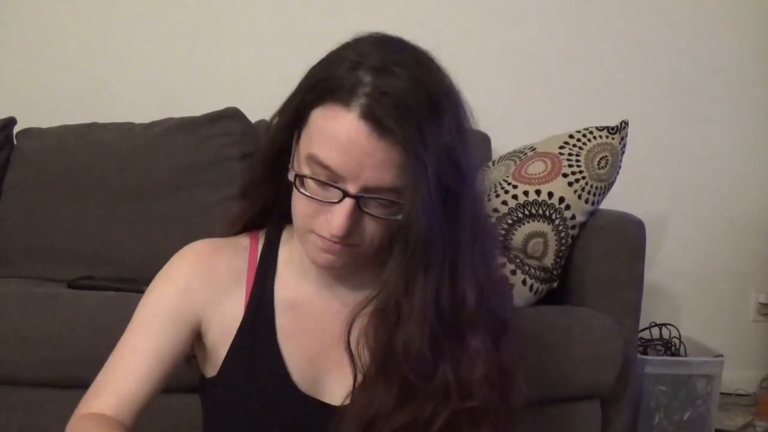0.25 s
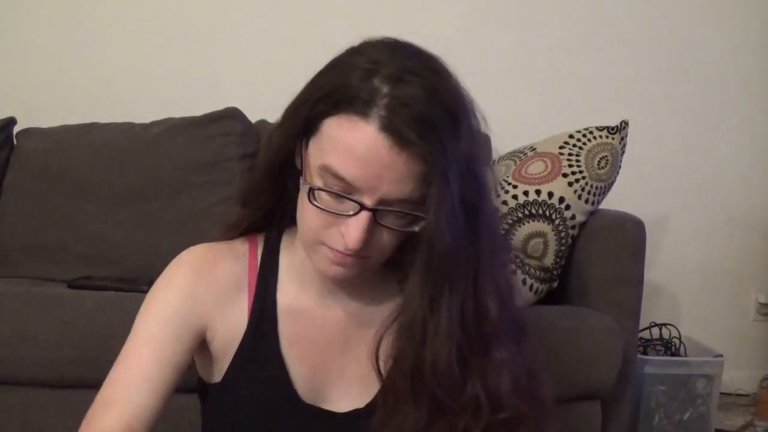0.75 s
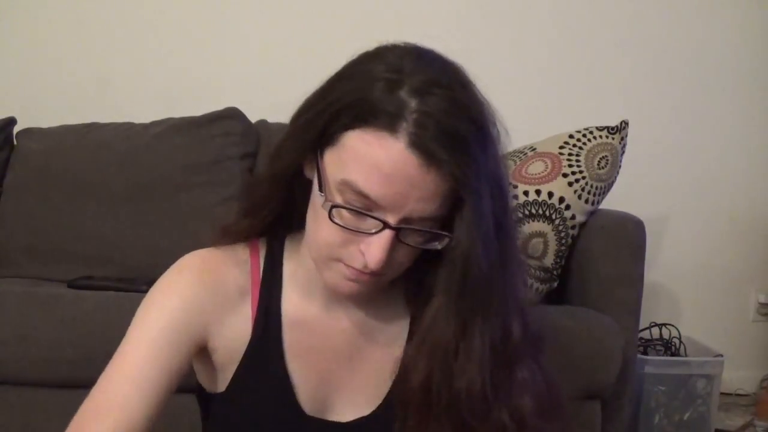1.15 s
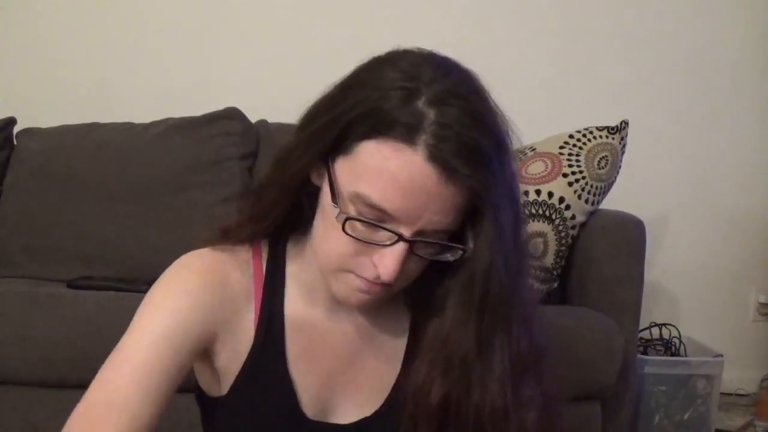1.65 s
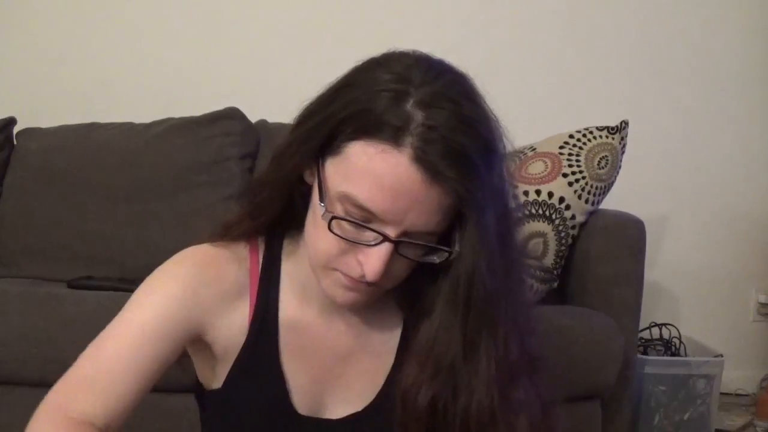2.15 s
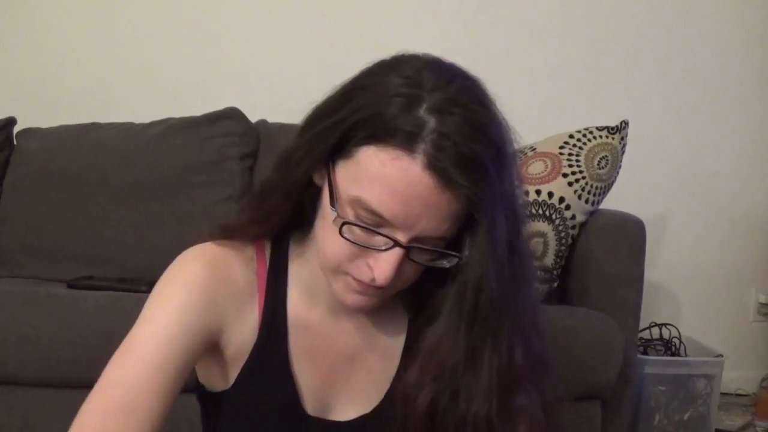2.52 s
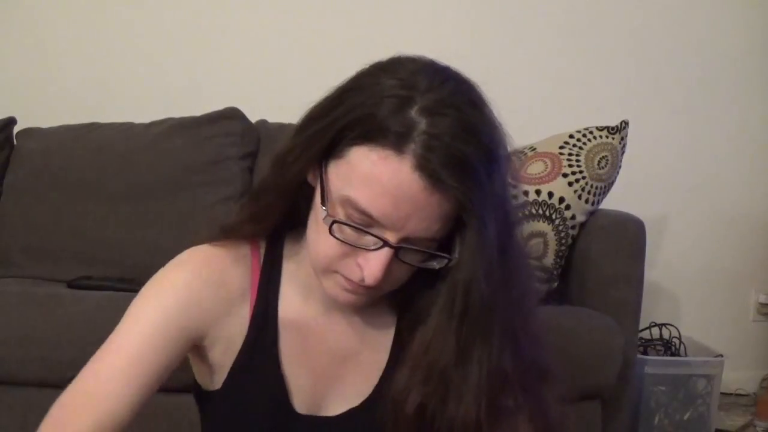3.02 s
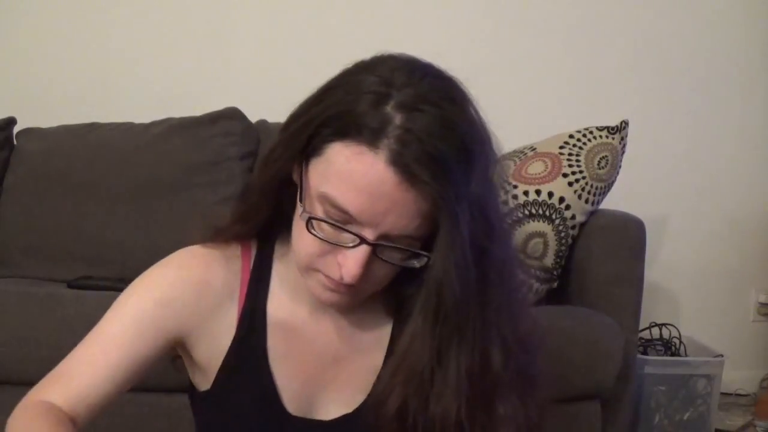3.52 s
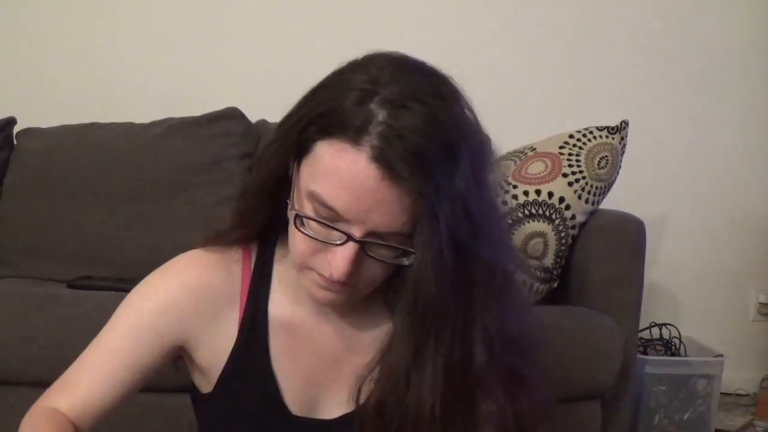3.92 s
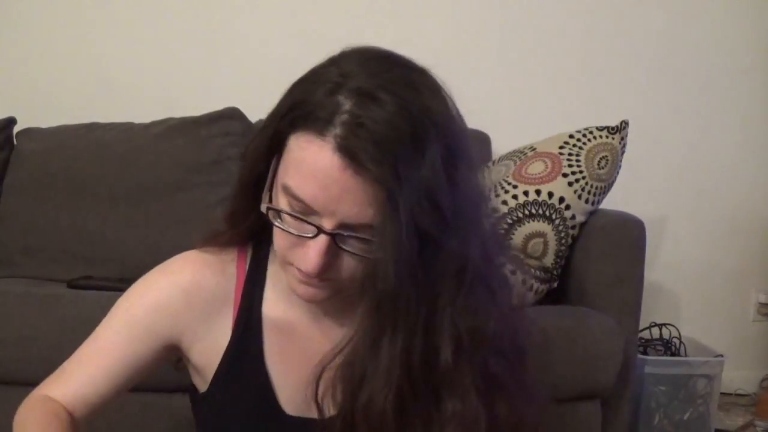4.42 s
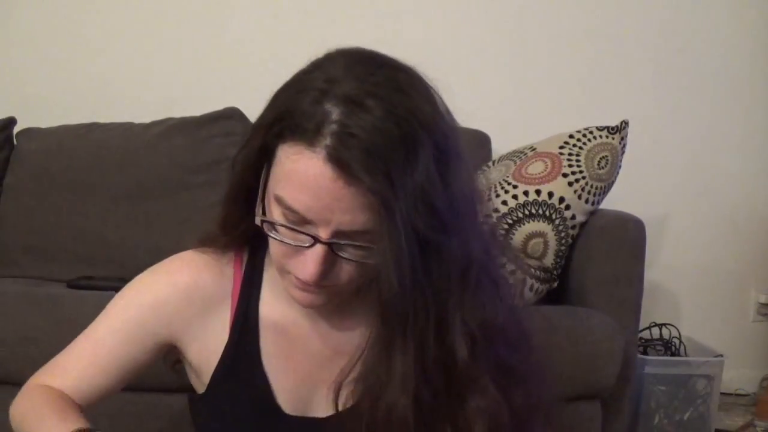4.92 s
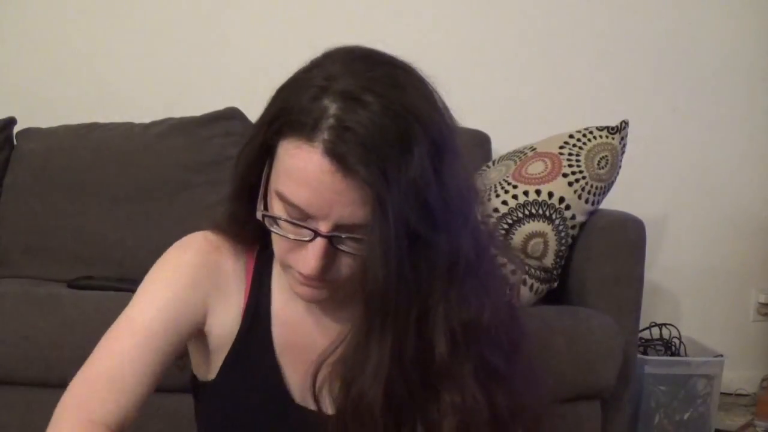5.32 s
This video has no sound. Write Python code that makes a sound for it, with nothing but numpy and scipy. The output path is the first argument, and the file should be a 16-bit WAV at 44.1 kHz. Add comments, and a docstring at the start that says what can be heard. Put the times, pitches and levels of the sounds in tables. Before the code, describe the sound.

Hands tear and crumple a padded paper mailer with crackling rips, crisp snaps and small hollow knocks in a quiet room.

```python
"""Tearing and crumpling a padded paper mailer

Hands work the mailer in a quiet furnished room. Fibres part in a dense crackle, creases buckle with
short snaps, and the air pouch knocks hollowly and bumps the surface under it.
Ventilation hums softly below. Two close microphones hear almost the same sound."""
import sys
import numpy as np
from scipy import signal
from scipy.fft import rfft, irfft
from scipy.io import wavfile

SR = 44100
rng = np.random.default_rng(int(sys.argv[2]) if len(sys.argv) > 2 else 0)


def wrap_up_sound(samples):
    """Save the sound to the file named by the first command line argument, as 16-bit audio."""
    columns = np.atleast_2d(samples).T
    # keep every value between -1 and 1, then stretch to whole-number steps
    tamed = np.clip(columns, -1, 1)
    steps = np.round(tamed * 32767).astype(np.int16)
    wavfile.write(sys.argv[1], SR, steps)


N = 245637

# The pouch's natural tones. Each row: pitch in Hz, level in dB, seconds to fade by 60 dB (t60).
POUCH_TONES = [(192.5, 9, 0.045), (332, -5.5, 0.077), (379, -3, 0.17), (444, -3.5, 0.13),
               (566, -2.5, 0.044), (669, -8, 0.11), (757, -5.5, 0.12), (944, 3, 0.018)]


def from_db(db):
    return 10 ** (np.asarray(db) / 20)


def rms_one(x):
    """Scale a signal to an average power of 1."""
    return x / np.sqrt(np.mean(x ** 2) + 1e-20)


def filtered(x, order, hz, kind):
    """Keep the lows, the highs or a band; a higher order cuts more steeply."""
    return signal.sosfilt(signal.butter(order, hz, kind, fs=SR, output="sos"), x)


def coloured(x, spectrum):
    """Shape a sound's tone from rows of Hz and dB; the result has power 1."""
    hz, db = np.transpose(spectrum)
    grid = np.maximum(np.fft.rfftfreq(4096, 1 / SR), 10)
    cepstrum = irfft(np.interp(np.log(grid), np.log(hz), db) * np.log(10) / 20)
    cepstrum[1:2048] *= 2  # folded forward, so nothing sounds before its cause
    cepstrum[2049:] = 0
    response = irfft(np.exp(rfft(cepstrum)))
    return rms_one(signal.fftconvolve(x, response[None], axes=-1)[..., :N])


def resonate(x, hz, t60):
    """Each click in x starts a fading tone as strong as the click."""
    decay, step = from_db(-60 / (t60 * SR)), 2 * np.pi * hz / SR
    return signal.lfilter([0, np.sin(step)], [1, -2 * decay * np.cos(step), decay ** 2], x)


def drift(hz):
    """A smooth random wobble with a typical size of 1."""
    decay = np.exp(-2 * np.pi * hz / SR)
    return rms_one(signal.lfilter([1], [1, -2 * decay, decay ** 2], rng.standard_normal(N + SR))[SR:])


def room_hum():
    """Ventilation noise, nearly alike on both sides, with a faint tone from the mains power."""
    # The tone of the moving air. Each row: frequency in Hz, relative level in dB.
    air_spectrum = [(15, -46), (25, -53), (65, 2.5), (193, -1), (338, 4.5), (475, -0.5), (920, -11),
                    (1060, -23), (1190, -11), (2310, -42), (3000, -8.5), (3900, -14), (6600, -120)]
    air_db, mains_hz, mains_db = -51.5, 240, -59.5
    middle, side = rng.standard_normal((2, N))
    air = coloured(middle + 0.18 * side * np.array([[1], [-1]]), air_spectrum)
    mains = np.sin(2 * np.pi * mains_hz * np.arange(N) / SR)
    return from_db(air_db) * air + from_db(mains_db) * mains


def hand_levels():
    """Each hand movement swells and fades. Gives fibre, sheet and pouch levels over time, in dB."""
    # Pulls, squeezes and slides. Each row: time of greatest force, swell and fade, all in seconds,
    # then the peak levels of fibres, sheet and pouch in dB.
    moves = [(.055, 0.087, 0.024, -29, -36, -43.5), (.1, 0.022, 0.13, -34.5, -39.5, -49),
             (.27, 0.1, 0.054, -37.5, -47, -72), (.36, 0.037, 0.067, -35, -49.5, -47.5),
             (.5, 0.15, 0.068, -34, -39, -48), (.68, 0.025, 0.083, -37, -43, -53),
             (.79, 0.0092, 0.011, -34, -38.5, -45), (.9, 0.08, 0.036, -31.5, -40, -43.5),
             (.99, 0.035, .075, -20.5, -31, -38.5), (1.188, 0.034, 0.03, -25.5, -35.5, -40),
             (1.25, .01, 0.027, -38, -32.5, -32), (1.33, 0.0046, 0.092, -36, -41.5, -47.5),
             (1.5, 0.086, 0.044, -38, -40, -51), (1.58, 0.0066, 0.038, -31, -39, -39),
             (1.64, 0.0068, 0.021, -27.5, -35.5, -41), (1.856, 0.12, 0.11, -15.5, -23.5, -33),
             (1.981, 0.045, 0.044, -22.5, -28, -32), (2.13, 0.07, 0.059, -33, -44, -60),
             (2.199, 0.017, 0.14, -29.5, -37, -49), (2.39, 0.096, 0.067, -28, -36.5, -42.5),
             (2.57, 0.18, 0.092, -33, -38, -44), (2.67, 0.041, 0.08, -23, -29, -29),
             (2.79, 0.068, 0.056, -36.5, -39.5, -44), (2.935, 0.067, 0.079, -22.5, -25.5, -34),
             (3.029, 0.015, 0.023, -41, -38, -28.5), (3.1, 0.064, 0.11, -27, -36, -42.5),
             (3.259, 0.069, 0.055, -30, -35.5, -36.5), (3.34, .04, 0.1, -35, -41, -61),
             (3.44, 0.093, 0.18, -35.5, -43.5, -46), (3.54, 0.0084, 0.092, -36, -39, -47),
             (3.659, 0.083, 0.038, -33, -44, -50), (3.719, .015, .1, -31, -41, -52),
             (3.94, 0.055, 0.1, -35, -44.5, -48), (4.21, 0.029, 0.085, -36.5, -38, -50),
             (4.335, .015, 0.11, -36, -42, -47), (4.578, 0.052, 0.037, -31, -38, -44.5),
             (4.76, 0.23, 0.11, -23.5, -34.5, -46), (4.87, 0.013, 0.056, -31, -42, -41),
             (5.13, 0.02, 0.091, -33.5, -43.5, -45), (5.25, 0.073, .06, -32, -37.5, -42),
             (5.38, 0.034, 0.026, -41, -42.5, -40.5), (5.48, 0.028, 0.075, -26, -31, -35.5)]
    sags_db, rests_db = [8.5, 8, 9], [-45, -51.5, -55.5]  # drop from peak to ends; level between moves
    edge_db_per_s = 282  # steep start and stop beyond those ends
    t = np.arange(0, N / SR + .004, .002)
    peak_s, swell_s, fade_s, *peaks_db = np.transpose(moves)[:, :, None]
    span_s = np.maximum(np.where(t < peak_s, swell_s, fade_s), .002)
    away_s = np.abs(t - peak_s)
    arch = np.minimum(away_s / span_s, 1) ** 1.41  # holds near the peak, drops most near the ends
    edge_db = edge_db_per_s * np.maximum(away_s - span_s, 0)
    levels = []
    for peak_db, sag_db, rest_db in zip(peaks_db, sags_db, rests_db):
        strengths = from_db(peak_db - sag_db * arch - edge_db)
        power = from_db(rest_db) ** 2 + np.sum(strengths ** 2, axis=0)
        levels.append(np.interp(np.arange(N) / SR, t, 10 * np.log10(power)))
    return levels


def tiny_breaks(per_s, spread_db, fade_s, clump_db, hiss):
    """Clumps of breaks, each a puff of noise, over the hiss of parting paper. Gives middle and side."""
    sizes = from_db(spread_db * np.minimum(rng.exponential(1, N), 3))
    breaking = rng.random(N) < per_s / SR
    decay = np.exp(-1 / (fade_s * SR))
    puffs = rms_one(signal.lfilter([1], [1, -decay], sizes * breaking))
    strength = (puffs + hiss) / np.sqrt(1 + hiss + hiss ** 2)
    return from_db(clump_db * drift(hz=34.7)) * strength * rng.standard_normal((2, N))


def rustle():
    """Parting fibres make the highs, the flexing sheet the mid tones, the air pouch the lows."""
    # The tone of each of the three parts. Each row: frequency in Hz, relative level in dB.
    fibre_spectrum = [(2500, -37), (4000, -4), (5500, -3), (7500, -1), (9500, 2.5), (11500, -7.5)]
    sheet_spectrum = [(600, -14), (1100, 1), (2000, 3.5), (3000, 2.5), (4000, 1.5), (6000, -26.5)]
    pouch_spectrum = [(60, -66), (150, -10.5), (300, -5), (400, -4), (520, -4.5), (720, -4), (1100, -10),
                      (1800, -22)]
    fibre_db, sheet_db, pouch_db = hand_levels()
    pull = np.clip((fibre_db + 44.5) / 12, 0, 1.5)  # a hard pull merges the breaks into a smooth rip
    tearing = tiny_breaks(per_s=250, spread_db=6, fade_s=.0006, clump_db=1.83, hiss=1.46 + .91 * pull)
    fibre = coloured(tearing, fibre_spectrum)

    flexing = tiny_breaks(per_s=120, spread_db=3, fade_s=.0025, clump_db=3, hiss=1.1 + pull)
    sheet = coloured(tearing + flexing, sheet_spectrum)
    # A light slide that barely rumples the pouch stirs less of the sheet's low end.
    thin_hz, thin_db = 1670, 0.2 * np.minimum(pouch_db + 43.5, 0)
    sheet = filtered(sheet, 3, thin_hz, "high") + from_db(thin_db) * filtered(sheet, 3, thin_hz, "low")

    rumple = .4 * tearing + tiny_breaks(per_s=150, spread_db=1.5, fade_s=.003, clump_db=1.2, hiss=3)
    hollow = sum(from_db(db) * resonate(rumple, hz, t60) for hz, db, t60 in POUCH_TONES)
    hollow = rms_one(filtered(hollow, 4, 240, "high"))
    pouch = rms_one(coloured(rumple, pouch_spectrum) + 0.16 * hollow)
    return from_db(fibre_db) * fibre + from_db(sheet_db) * sheet + from_db(pouch_db) * pouch


def pouch_knocks():
    """A knock sets the pouch's tones ringing, most of all those near its own pitch."""
    # Hollow knocks. Each row: start in seconds, relative level in dB, most excited pitch in Hz.
    knocks = [(0.048, -24, 655), (0.067, -33, 200), (.368, -29, 850), (1.235, -10.5, 660),
              (1.257, -24.5, 405), (1.57, -29.5, 403), (1.99, -14.5, 645), (2.191, -26.5, 720),
              (2.373, -19, 590), (2.52, -20.5, 420), (2.627, -20.5, 750), (2.66, -11.5, 645),
              (2.701, -24, 436), (2.869, -21, 710), (2.979, -20, 705), (2.996, -16.5, 440),
              (3.02, -20, 423), (3.028, -17, 455), (3.052, -23, 442), (3.29, -28.5, 422),
              (4.563, -23, 570.5), (4.863, -24.5, 830), (5.247, -38, 225), (5.368, -37, 756),
              (5.468, -19, 875)]
    start_s, knock_db, knock_hz = np.transpose(knocks)
    out = np.zeros(N)
    for k, (hz, tone_db, t60) in enumerate(POUCH_TONES):
        octaves_away = np.abs(np.log2(hz / knock_hz))
        clicks = np.full(N, 1e-18)
        clicks[np.round(start_s * SR).astype(int)] = from_db(knock_db + tone_db - 18 * octaves_away)
        out += 0.52 * (-1) ** k * resonate(clicks, hz, t60)
    return out


def faint_creases(count):
    """Small creases give way at random, a bit louder when the hands work harder. Gives rows of snaps."""
    when, pitch, ring_luck, crack_luck = rng.random((count, 4)).T
    fibre_db = hand_levels()[0][(when * N).astype(int)]
    base_db = -35 + 0.31 * (fibre_db + 35)
    ring_db = base_db + 3 + (2 * ring_luck - 1)
    crack_db = base_db + 8.5 + (2 * crack_luck - 1)
    return list(zip(when * N / SR, 1500 * 2.6 ** pitch, ring_db, crack_db))


def crease_snaps():
    """A crease buckles with a bright crack; its paper panel adds a dull puff and a brief ring."""
    # Loud buckles. Each row: start in seconds, panel pitch in Hz, ring level in dB, crack level in dB.
    loud_creases = [(.0507, 1510, -16, -40), (.0696, 2360, -12, -13), (.37, 1200, -25, -25),
                    (.5109, 3980, -11, -9.5), (.5422, 3280, -21, -18), (.8427, 3600, -18, -22),
                    (.845, 2950, -19, -14.5), (.8841, 3580, -21, -32), (.9, 3490, -22, -15),
                    (.9633, 3080, -15.5, -24), (.9826, 2300, -29, -7), (1.0596, 1550, -25, -8),
                    (1.1342, 3790, -37, -17), (1.2345, 1610, -6.5, -5.5), (1.2585, 2130, -12, -15),
                    (1.3048, 2240, -25, -23), (1.3271, 1850, -18.5, -21), (1.3466, 4130, -14, -11),
                    (1.4108, 3450, -18.5, -24), (1.4252, 3440, -12, -28), (1.5718, 1950, -19, -35),
                    (1.5878, 1440, -21, -20), (1.6256, 1800, -30, -12.5), (1.638, 1830, -19, -38),
                    (1.6887, 3770, -11.5, -10), (1.7466, 2120, -25, -4), (1.7603, 2370, -28, -5),
                    (1.7752, 3930, -10, -19), (1.7845, 2250, -13, -17), (1.7971, 3170, -9, -13),
                    (2.0925, 2153, -26, -18), (2.1205, 3000, -20, -16), (2.1927, 3990, -16, -11),
                    (2.2238, 2300, -41, -14), (2.2949, 3900, -33, -11), (2.3166, 3820, -6, -4),
                    (2.3743, 1830, -11, -22), (2.4144, 2750, -29, -18), (2.4562, 3990, -22, -16),
                    (2.5188, 2800, -12.5, -13), (2.5231, 2600, -14.5, -12), (2.586, 2380, -20, -13.5),
                    (2.6087, 1760, -19, -11), (2.6208, 4060, -7.5, -9), (2.673, 790, -18, -8),
                    (2.7221, 1430, -15.5, -23), (2.7551, 3220, -12.5, -19), (2.8699, 1970, -17.5, -19),
                    (2.8941, 3250, -12, -14), (2.9158, 3380, -7, -13), (2.9427, 2440, -13, -15),
                    (2.9487, 1660, -15, -7.5), (2.979, 1320, -16, -14), (2.9968, 1510, -10, -4),
                    (3.0072, 2870, -19, -14), (3.0205, 930, -11, -16.5), (3.1893, 2530, -32, -23),
                    (3.217, 1390, -23, -18), (3.2384, 2900, -25, -17), (3.3704, 3350, -14, -13.5),
                    (3.4674, 3360, -26, -16), (3.5693, 2880, -13.5, -13), (3.6347, 1970, -19.5, -22),
                    (3.7927, 1080, -21.5, -12.5), (4.0037, 3840, -35, -23), (4.1202, 2060, -20, -29),
                    (4.1294, 1090, -20.5, -26), (4.206, 1520, -20.5, -23), (4.2306, 2320, -8.5, -12.5),
                    (4.3667, 2270, -21, -25), (4.4591, 2020, -21.5, -38), (4.5652, 1980, -6.5, -7.5),
                    (4.6025, 3200, -10, -6.5), (4.826, 1260, -19.5, -8), (4.9594, 695, -29.5, -17.5),
                    (5.0078, 2630, -29, -30), (5.0528, 3500, -39, -22), (5.0689, 3960, -36, -19.5),
                    (5.1164, 675, -27, -19), (5.1822, 1950, -9, -6), (5.2568, 1140, -16.5, -15.5),
                    (5.283, 3000, -40, -19), (5.3405, 3000, -35, -18.5), (5.3675, 790, -22, -28),
                    (5.4714, 1480, -12, -20)]
    ring_cycles, ring_cap_s, typical_burst_s, samples = 15.3, 0.011, 0.00096, 2048
    out, t = np.zeros(N + samples), np.arange(samples) / SR
    for start_s, hz, ring_db, crack_db in faint_creases(count=18) + list(loud_creases):
        crack_noise, puff_noise = rng.standard_normal((2, samples))
        # The more the ring outweighs the crack, the longer it lasts and the stronger the puff.
        hollow_db = max(ring_db - crack_db, 0)
        t60 = min(ring_cycles / hz, ring_cap_s) * (1 + 0.13 * hollow_db)
        attack = 1 - np.exp(-t / 0.000071)
        ring = np.sin(2 * np.pi * hz * t) * attack * from_db(-60 * t / max(t60, .002))
        burst_s = typical_burst_s * from_db(4 * puff_noise[-1])  # a random length
        burst = np.exp(-t / max(burst_s, .0002))
        puff = filtered(puff_noise * burst, 2, [.4 * hz, 2.6 * hz], "band")
        crack = filtered(crack_noise * burst, 2, [5400, 11000], "band")
        panel = 0.69 * ring + .85 * from_db(0.15 * hollow_db) * puff / np.abs(puff).max()
        at = round(start_s * SR)
        out[at:at + samples] += from_db(ring_db) * panel + from_db(crack_db) * crack / np.abs(crack).max()
    return filtered(out[:N], 2, 330, "high")  # small panels give off no bass


def surface_thuds():
    """The mailer softly bumps the surface under it, which rings with two low tones."""
    # The bumps. Each row: start in seconds, relative level in dB.
    bumps = [(0.374, -44), (2.984, -46), (3.549, -45), (4.57, -44), (5.254, -45), (5.484, -45)]
    hz, t60 = 73.4, .12
    clicks = np.full(N, 1e-18)
    for start_s, db in bumps:
        clicks[round(start_s * SR)] = from_db(db)
    pushes = filtered(clicks, 2, [45, 150], "band")
    return resonate(pushes, hz, t60) + 1.1 * resonate(pushes, 1.7 * hz, 1.1 * t60)


def echoes(x, t60, first_s):
    """Many echoes blur into a fading tail of noise, a different one for each microphone."""
    t = np.arange(round(.4 * SR)) / SR
    tails = rng.standard_normal((2, len(t))) * from_db(-60 * t / t60) * (t > first_s)
    tails = signal.lfilter([1], [1, -.45], tails)  # soft furnishings dull the echoes
    tails = filtered(tails, 1, 400, "high")  # bass reaches both microphones alike
    tails /= np.sqrt(np.sum(tails ** 2, axis=1, keepdims=True))
    return signal.fftconvolve(x[None], tails, axes=-1)[:, :N]


def scene():
    """The mailer is wide and moves a little; nearby surfaces echo first, then the room."""
    # Where the hands are. Each row: time in seconds, how much louder left is than right in dB.
    hand_places = [(0.0, 0.5), (0.42, 0.5), (1.24, -0.5), (3.88, 1.0), (4.14, 3), (4.93, 0.5), (5.57, 1)]
    balance_db = np.interp(np.arange(N) / SR, *np.transpose(hand_places))
    middle, side = rustle()
    mailer = middle + crease_snaps() + pouch_knocks()
    direct = mailer * from_db(balance_db * np.array([[.5], [-.5]]))
    nearby = from_db(-18) * echoes(mailer, t60=0.0059, first_s=.0004)[0]
    width = (from_db(-30) * side + nearby) * [[1], [-1]]  # added on the left, subtracted on the right
    room = from_db(-16.5) * echoes(mailer, t60=0.17, first_s=0.015)
    return direct + width + room + room_hum() + surface_thuds()


def record(dry):
    """Round off the loudest peaks and cut the highest treble steeply."""
    ceiling, cutoff_hz = .85, 11050
    rounded = ceiling * np.tanh(dry / ceiling)
    return signal.sosfilt(signal.ellip(12, .3, 75, cutoff_hz, fs=SR, output="sos"), rounded)


dry = scene()
out = record(dry)
wrap_up_sound(out)
```